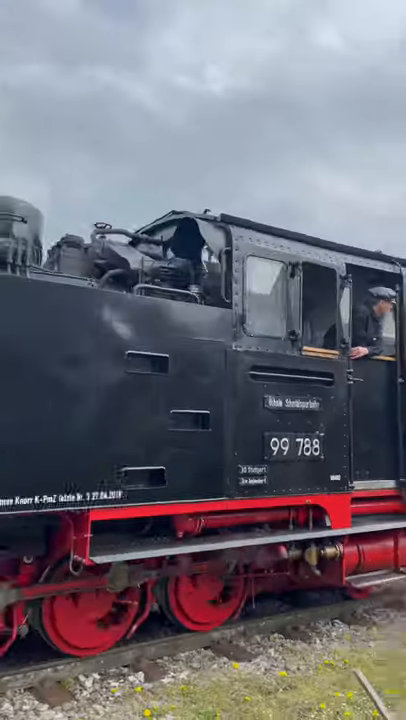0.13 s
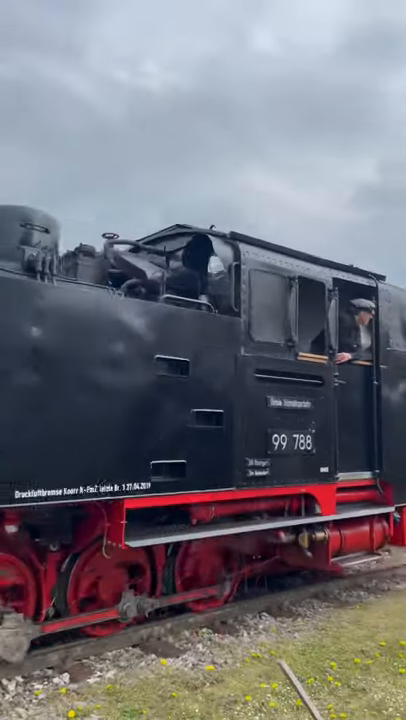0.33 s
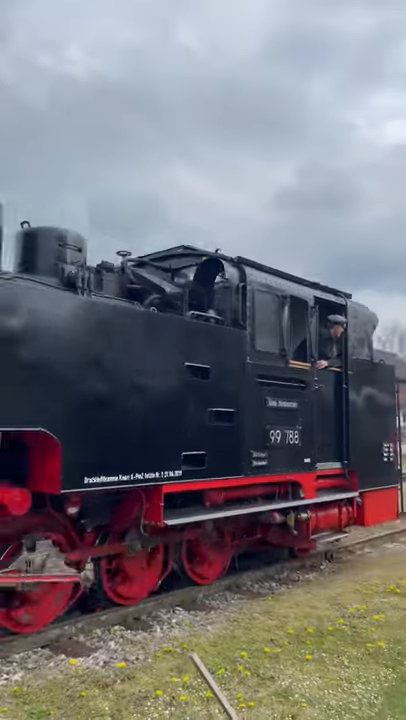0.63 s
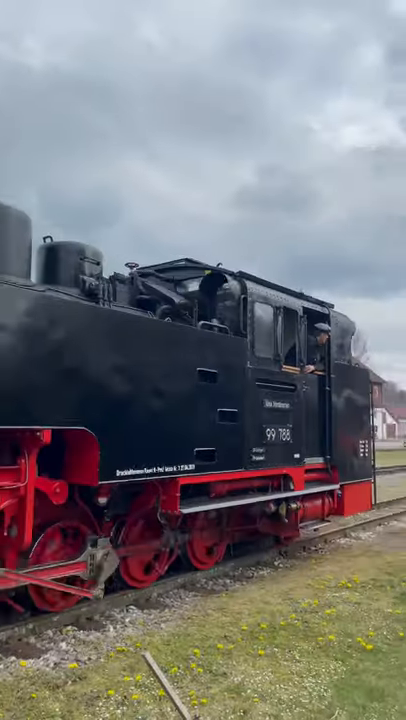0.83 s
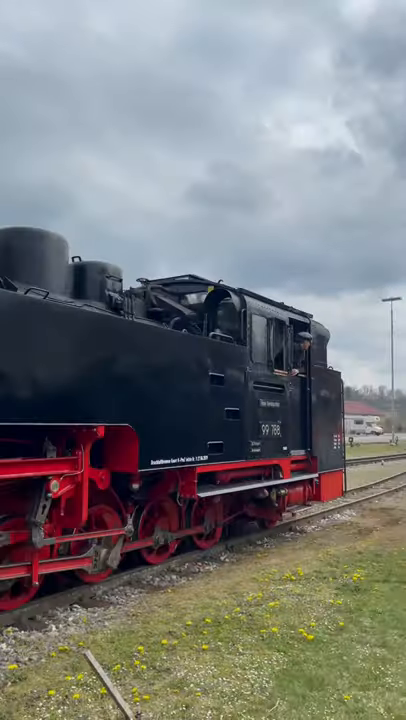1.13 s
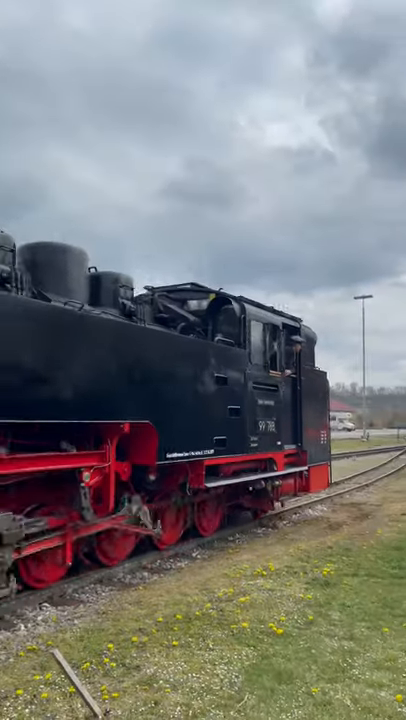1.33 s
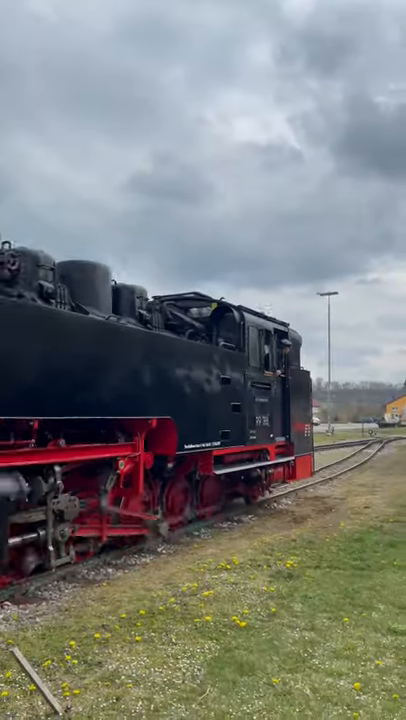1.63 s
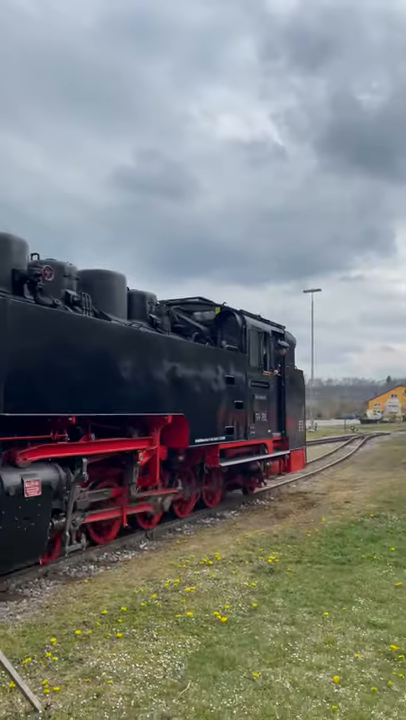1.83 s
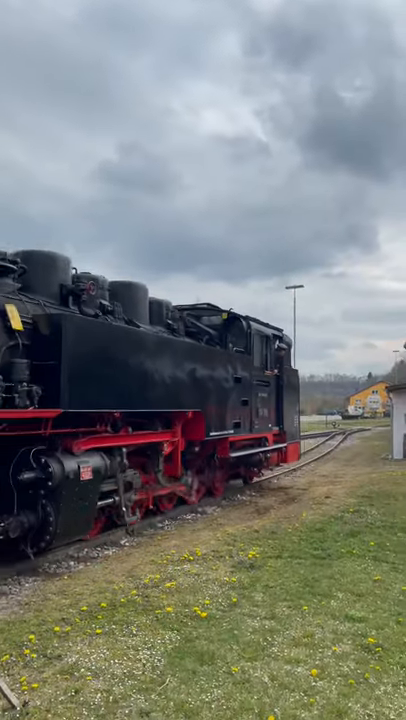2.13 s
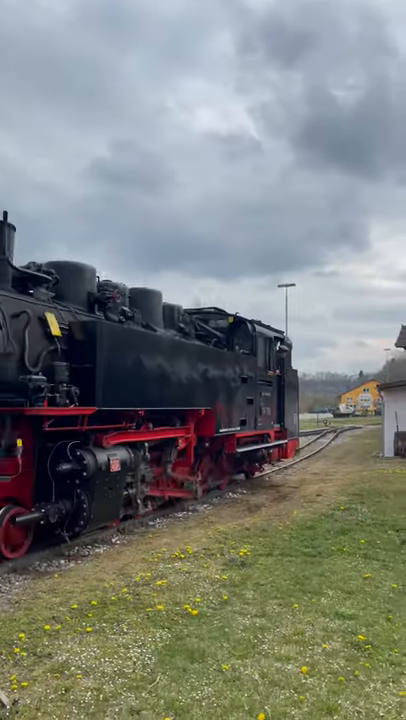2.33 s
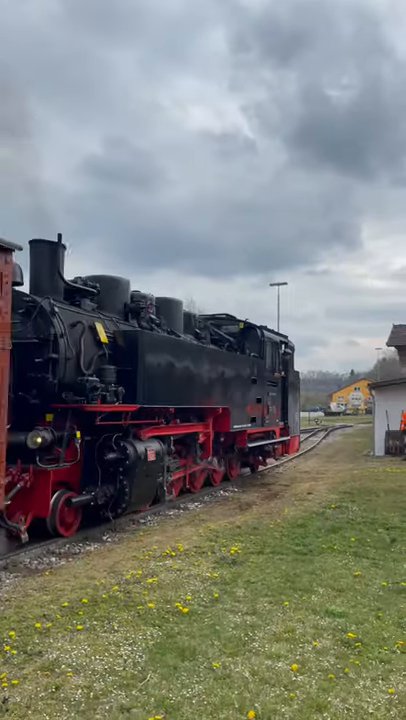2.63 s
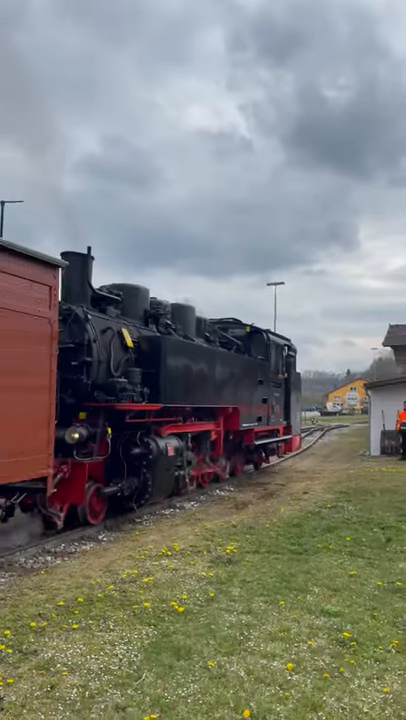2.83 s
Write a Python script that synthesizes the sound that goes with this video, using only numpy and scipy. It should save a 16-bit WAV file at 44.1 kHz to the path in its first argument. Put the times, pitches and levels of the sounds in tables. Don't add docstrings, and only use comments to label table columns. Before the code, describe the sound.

Close outdoor phone pickup of a passing steam engine: a hard metallic clank at the start, steady low rumble, knocks and soft chimney thumps, more clanks, then bursts of valve steam over a thin high hiss.

```python
import sys
import numpy as np
from scipy import signal
from scipy.fft import rfft, irfft
from scipy.io import wavfile

SR = 44100
rng = np.random.default_rng(int(sys.argv[2]) if len(sys.argv) > 2 else 0)


def boost(x):
    u = np.asarray(x, float) / 20
    return 10 ** u


def inscribe(sig):
    pcm = np.round(np.clip(np.atleast_2d(sig).T, -1, 1) * 32767)
    wavfile.write(sys.argv[1], SR, pcm.astype(np.int16))


N = 131859
T = np.arange(N) / SR
HZ = np.fft.rfftfreq(N, 1 / SR) + 1e-3

# time in seconds, level in [dB].
ROLLING_LOAD = [(0.0, -27.5), (0.42, -29.5), (0.63, -29), (0.97, -26.5), (1.68, -23.5), (1.98, -24.5),
                (2.65, -21.5), (2.99, -23.5)]
# frequency in [Hz], density in [dB per Hz].
RUMBLE_SPECTRUM = [(28, 0), (50, 2.5), (110, 0.5), (260, -1.5), (450, -10), (1000, -17.5), (3000, -26),
                   (9000, -40)]
# pitch in [Hz], width in [Hz], level in [dB].
SINGING_LINES = [(698, 62, -22), (1196, 9.4, -20.5), (1590, 15, -20), (2064, 20, -32.5), (2390, 28, -20),
                 (2980, 21, -25), (3540, 25, -24), (3816, 30, -27), (4300, 59, -25.5)]
# start in seconds, peak in [dB], dullness in [dB per octave],
# low push in [dB], ring pitch as a [ratio].
JOINT_CLANKS = [(.0572, -6.5, -0.5, -24, 1.04), (.0622, -15.5, 3, -15, 0.89), (.5402, -8, 0.5, -12, 0.95),
                (.5458, -16.5, 3.5, -14, 1.02), (.855, -24, 5.5, -10, 0.67), (.981, -20, 0.5, -14, 1.24),
                (1.192, -28.5, -5.5, -17, .99), (1.4465, -4, 2.5, -16, 0.94), (2.141, -8.5, 3, -22, 0.86),
                (2.482, -20, 2, -17, 0.85), (2.845, -8.5, 2, -9, 1), (2.850, -7.5, 1.5, -2, 0.97)]
# frequency in [Hz], density in [dB per Hz].
CRACK_SPECTRUM = [(150, -4.5), (500, -4), (1000, -2), (2500, -10.5), (4500, -7.5), (6500, -11),
                  (11000, -11), (14000, -14)]
# pitch in [Hz], level in [dB], 60 dB decay in seconds [s].
WHEEL_MODES = [(530, -19, 0.035), (680, -4, 0.073), (860, -4, 0.033), (1122, 2, 0.031), (1435, -3.5, 0.013),
               (1660, -3, 0.066), (1985, -5.5, 0.045), (2430, 2.5, 0.037), (2683, 7, 0.022),
               (3310, 0.5, 0.039), (3910, -2.5, 0.022), (4450, -3, 0.022), (5840, -4, 0.029),
               (6500, -22, 0.013)]
# start in seconds, peak in [dB], pitch in [Hz].
ROD_KNOCKS = [(0.067, -16, 164), (0.108, -14, 120), (0.196, -9, 197), (0.561, -25, 237), (0.715, -28, 197),
              (0.851, -2, 200), (0.996, -6, 204), (1.153, -18, 206), (1.329, -14, 143), (1.429, -17, 150),
              (1.4797, -6, 150), (1.699, -5, 150), (1.875, -9, 245), (2.029, -8.5, 191), (2.153, -6, 255),
              (2.189, -14, 182), (2.288, -12, 230), (2.38, -29, 151), (2.561, -9, 290), (2.835, -10, 200),
              (2.851, -6, 258)]
# start in seconds, level in [dB], pitch in [Hz].
EXHAUST_BEATS = [(0.001, -27, 67), (0.068, -23, 62.7), (0.217, -21, 65), (0.549, -30, 65),
                 (0.721, -22.5, 73), (0.838, -17.5, 66), (0.963, -16, 65), (1.04, -15, 60.6),
                 (1.17, -21.5, 66.6), (1.399, -16, 66.5), (1.5, -14.5, 55.3), (1.622, -47, 74.3),
                 (1.698, -16, 89.5), (1.80, -16.5, 58.3), (1.986, -17.5, 86), (2.079, -21.5, 106),
                 (2.267, -13, 53.6), (2.331, -26, 59), (2.551, -26, 63), (2.629, -22, 49.5),
                 (2.696, -27.5, 78), (2.918, -40, 72.5)]
# centre in seconds, length in seconds, level in [dB], brightness in [dB per octave].
STEAM_PUFFS = [(0.402, 0.086, -28, -6), (0.51, 0.099, -33.5, -4), (1.008, 0.051, -31, -8),
               (1.077, 0.085, -31, -1), (1.532, 0.065, -16, -3), (1.635, 0.062, -23, -6.5),
               (1.703, 0.055, -23.5, -4.5), (1.85, 0.28, -35.5, -1), (2.197, 0.06, -21.5, -7),
               (2.287, 0.053, -18, -5.1), (2.352, 0.061, -16.5, -4), (2.465, 0.092, -27, -5),
               (2.579, 0.034, -25, -3.7), (2.662, 0.068, -31, -1), (2.872, 0.03, -22.5, -1.7),
               (2.936, 0.055, -12, -2.94), (2.99, 0.042, -19.5, -2.5)]
# frequency in [Hz], density in [dB per Hz].
PUFF_SPECTRUM = [(300, -13.5), (1000, -7.5), (2500, -3.5), (4500, -3), (6300, -4), (8500, -7.5),
                 (11000, -7), (13500, -23)]
# centre in seconds, length in seconds, level in [dB], pitch in [Hz].
DRY_SQUEAKS = [(0.415, 0.068, -36, 3840), (0.475, .06, -36.5, 3310), (0.99, 0.022, -30.5, 2493),
               (1.053, 0.035, -30.5, 3410), (1.08, 0.069, -42, 3930), (1.125, 0.13, -38, 2390),
               (1.3, 0.18, -62, 1630), (1.417, 0.15, -41, 3700), (2.105, 0.13, -54, 1580),
               (2.368, 0.031, -26.5, 3820), (2.945, 0.024, -21, 1115)]
# time in seconds, level in [dB].
LEAK_LEVEL = [(0.0, -34), (0.64, -38), (1.44, -38.5), (1.62, -39.5), (2.1, -42.5), (2.99, -38.5)]
# frequency in [Hz], density in [dB per Hz].
HISS_SPECTRUM = [(2000, -19), (5000, -16), (7000, -13.5), (9000, -6.5), (10900, 0.5), (12000, -9.5),
                 (13700, 0.5), (15500, -13)]
# frequency in [Hz], left's lead in [radians].
PORT_LEAD = [(20, 0), (2100, .1), (3000, 2.7), (3800, 1.1), (4900, 3.1), (5900, 6.28), (8300, 9.0),
             (9000, 9.4), (9700, 9.7), (12000, 12.56), (13800, 12.6), (15200, 15.7), (16000, 15.9)]
# frequency in [Hz], share from 0 to 1.
PORT_SHARE = [(40, 0.51), (300, 0.85), (800, 0.65), (1900, 0.85), (3000, 0.32), (4500, 0.54), (6000, 0.95),
              (8000, 0.95)]
# frequency in [Hz], left minus right in [dB].
PORT_TILT = [(60, 0.1), (370, 0.4), (800, 5.5), (1700, 1), (3000, 1.7), (5000, 0.5), (16000, 0)]
# frequency in [Hz], gain in [dB].
MIC_COLOUR = [(20, -35), (34, -25), (48, -1.5), (12000, -0.5), (13500, -22.5), (14500, -12), (15900, -21)]


def rms_one(x):
    return x / np.sqrt(np.mean(x ** 2) + 1e-20)


def at_hz(points, hz):
    table_hz, value = np.transpose(points)
    return np.interp(np.log(hz), np.log(table_hz), value)


def drift(rate):
    r = np.exp(-80 * np.pi * rate / SR)
    noise = rng.standard_normal(N // 40 + 2002)
    slow = signal.lfilter([1], [1, -2 * r, r * r], noise)[2000:]
    return np.interp(np.arange(N) / 40, np.arange(len(slow)), rms_one(slow))


def ring(x, hz, t60):
    r, w = boost(-60 / (t60 * SR)), 2 * np.pi * hz / SR
    return signal.lfilter([0, np.sin(w)], [1, -2 * r * np.cos(w), r * r], x + 1e-18)


def struck(out, s, hz, db, t60):
    age = T[:int(t60 * SR)]
    at = int(s * SR)
    sine = boost(db - 60 * age / t60) * np.sin(2 * np.pi * hz * age)
    out = out.copy()
    out[at:at + len(age)] += sine[:N - at]
    return out


def swell(centre, length):
    side = np.where(T < centre, 0.51, 0.6)
    return np.exp(-(np.abs(T - centre) / (side * length)) ** 2)


def bands(spectrum, envelope, patchy_db, rate):
    noise = rfft(rng.standard_normal((2, N))) * boost(at_hz(spectrum, HZ)) * (HZ > 20)
    noise = noise / np.sqrt(np.mean(irfft(noise, N) ** 2))
    out, shared = 0, drift(rate / 3)
    for hz in 2.0 ** np.arange(4.5, 14.1, .5):
        slot = np.cos(np.pi * np.clip(np.log2(HZ / hz), -.5, .5)) ** 2
        flicker = boost(patchy_db * (.7 * shared + drift(rate)))
        out = out + irfft(noise * slot, N) * flicker * envelope(np.log2(hz / 2000))
    return out


def rolling():
    load = boost(np.interp(T, *np.transpose(ROLLING_LOAD)))
    rumble = bands(RUMBLE_SPECTRUM, lambda octave: 1, patchy_db=.9, rate=14)
    for hz, width, level_db in SINGING_LINES:
        t60 = 2.2 / width
        line = ring(ring(rng.standard_normal((2, N)), hz, t60), hz, t60)
        rumble = rumble + rms_one(line) * boost(level_db - 8.0 + 2 * drift(15))
    return rumble * load * boost(4.5)


def low_lag(octave):
    return .0006 * max(1 - octave, 0)


def joint_touches():
    touch_s, loss_db = .0034, 4.5
    touches = []
    for s, db, dull, push, ratio in JOINT_CLANKS:
        for k in range(3):
            start = s + touch_s * k * (1 + .2 * rng.standard_normal())
            touches.append((start, db - loss_db * k, dull, push, ratio))
    return touches


def joint_cracks(touches):
    def envelope(octave):
        train = np.zeros(N)
        for s, db, dull, _, _ in touches:
            train[int((s + low_lag(octave)) * SR)] = boost(db - dull * octave)

        def fall(t60):
            return signal.lfilter([1], [1, -boost(-60 / (t60 * SR))], train + 1e-18)
        crack = boost(-17) * fall(0.026 * 2 ** (-.3 * octave))
        tail = boost(-20.5) * fall(0.18 * 2 ** (-.4 * octave))
        return crack + tail
    return bands(CRACK_SPECTRUM, envelope, patchy_db=4.0, rate=27)


def ringing_metal(touches):
    snap_hz, push_hz, mode_db, yard_t60 = 1550, 260, -13, 0.12
    metal = np.zeros(N)
    for s, db, dull, push, ratio in touches:
        part = struck(np.zeros(N // 16), 0, snap_hz * ratio, db + 3 - dull, 3.0 / snap_hz)
        part = struck(part, low_lag(-3.5), push_hz, db + push - 3.5, 0.067)
        for hz, level_db, t60 in WHEEL_MODES:
            octave = np.log2(hz / 2000)
            pitch = hz * ratio * (1 + 0.03 * rng.standard_normal())
            level = db + level_db + mode_db - dull * octave + 2.0 * rng.standard_normal()
            part = struck(part, low_lag(octave), pitch, level, np.clip(t60 * 1.07, .002, .08))
        at = int(s * SR)
        metal[at:at + len(part)] += rng.choice([-1, 1]) * part[:N - at]
    yard = rng.standard_normal(SR // 5) * boost(-60 * T[:SR // 5] / yard_t60)
    echo = signal.fftconvolve(metal, yard / np.sqrt(np.sum(yard ** 2)))[:N]
    return np.array([metal, echo])


def clanks():
    touches = joint_touches()
    return joint_cracks(touches) + ringing_metal(touches)


def knocks():
    out = np.zeros(N)
    for s, db, hz in ROD_KNOCKS:
        out = struck(out, s, hz, db - 3, t60=6 / hz)
    return out * [[1], [.4]]


def beats():
    rise_s, fall_s, churn_db = 0.0073, 0.034, -7.5
    low_band = signal.butter(2, [45, 300], "band", fs=SR, output="sos")
    churn = rms_one(signal.sosfilt(low_band, rng.standard_normal((2, N))))
    out = np.zeros((2, N))
    for s, db, hz in EXHAUST_BEATS:
        age = np.maximum(T - s, 0)
        shape = (1 - np.exp(-age / rise_s)) * np.exp(-age / fall_s) * 2.07
        tone = np.sin(2 * np.pi * (hz * age + rng.random())) * [[1], [.3]]
        out += boost(db) * shape * (tone + boost(churn_db) * churn)
    return out


def puffs():
    shapes = [(db, tilt, swell(s, length)) for s, length, db, tilt in STEAM_PUFFS]

    def envelope(octave):
        return sum(boost(db + tilt * octave) * shape for db, tilt, shape in shapes)
    return bands(PUFF_SPECTRUM, envelope, patchy_db=1.5, rate=28)


def squeaks():
    white = rng.standard_normal((2, N)) * boost(4 * drift(60))
    t60 = 3.8 / 210
    out = 0
    for s, length, db, hz in DRY_SQUEAKS:
        tone = rms_one(ring(ring(white, hz, t60), hz, t60))
        out = out + boost(db + 1) * swell(s, length) * tone
    return out


def leak():
    level = np.interp(T, *np.transpose(LEAK_LEVEL)) + 8
    dulling = 25 * np.minimum(T, 1.8)

    def envelope(octave):
        return boost(level - dulling * max(octave - 2.5, 0))
    return bands(HISS_SPECTRUM, envelope, patchy_db=1.0, rate=12)


def scene():
    return rolling() + clanks() + knocks() + beats() + puffs() + squeaks() + leak()


def low_pass(x):
    return signal.sosfilt(signal.butter(12, 15850, fs=SR, output="sos"), x)


def record(dry):
    common = np.clip(at_hz(PORT_SHARE, HZ), 0, 1)
    direct, scattered = rfft(dry) * np.sqrt([(1 + common) / 2, (1 - common) / 2])
    tilt = boost(at_hz(PORT_TILT, HZ) * (HZ < 5000) / 2)
    twist = np.exp(-1j * np.interp(HZ, *np.transpose(PORT_LEAD)))
    left = (direct + scattered) * tilt
    right = (direct - scattered) * twist / tilt
    pair = irfft(np.array([left, right]) * boost(at_hz(MIC_COLOUR, HZ)), N)
    ceiling = .95
    held = ceiling * pair / (ceiling ** 6 + pair ** 6) ** (1 / 6)
    return low_pass(held)


dry = scene()
out = record(dry)
inscribe(out)
```